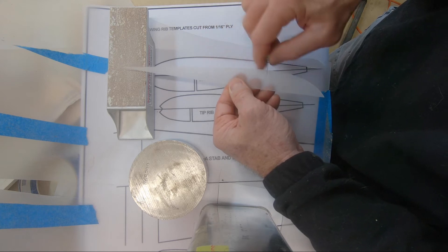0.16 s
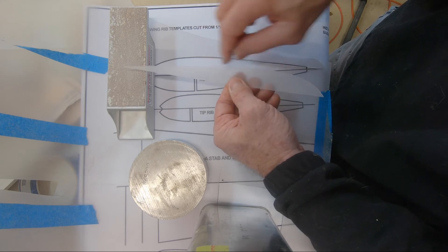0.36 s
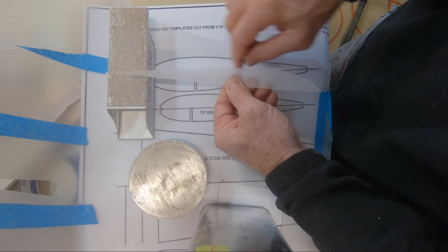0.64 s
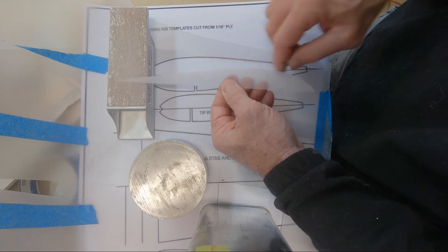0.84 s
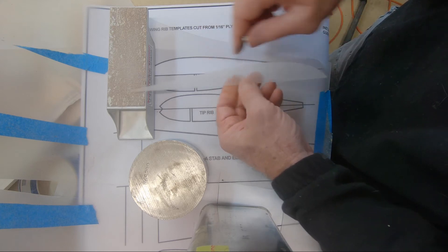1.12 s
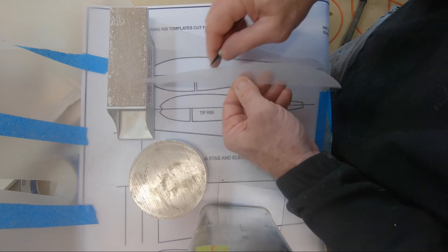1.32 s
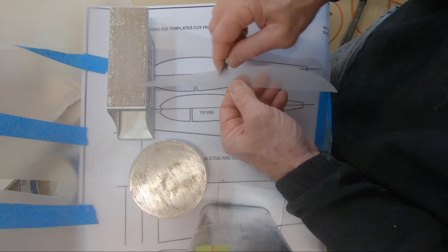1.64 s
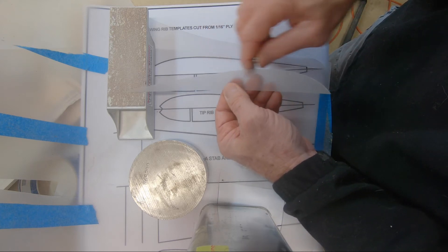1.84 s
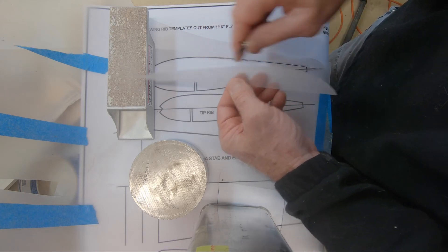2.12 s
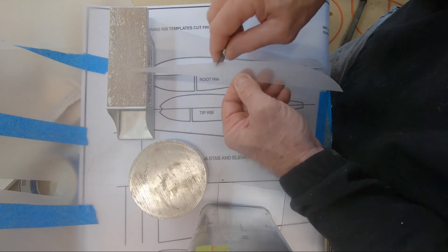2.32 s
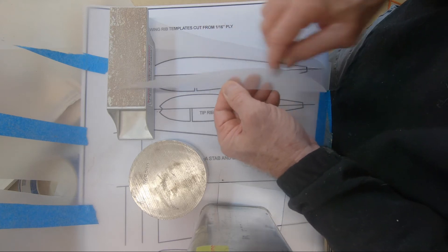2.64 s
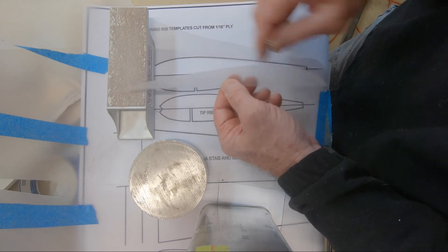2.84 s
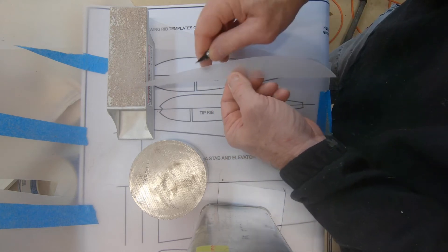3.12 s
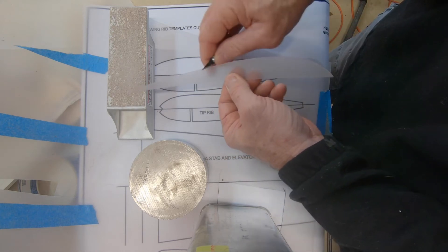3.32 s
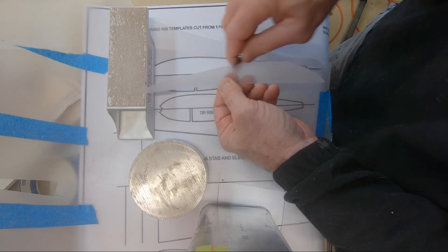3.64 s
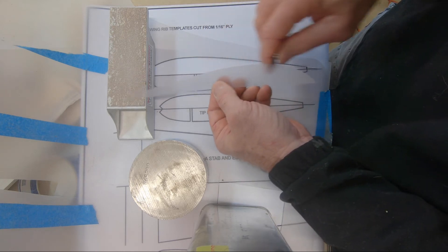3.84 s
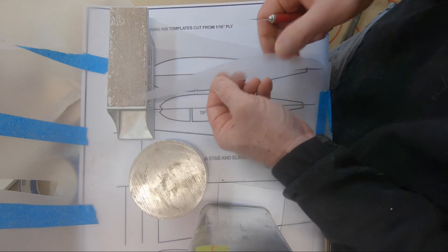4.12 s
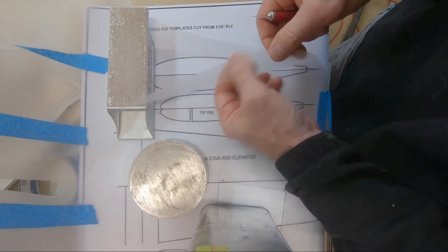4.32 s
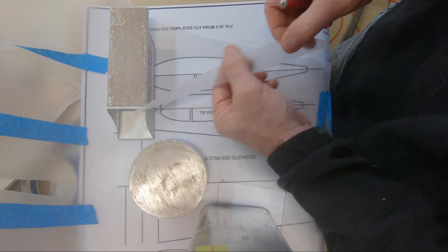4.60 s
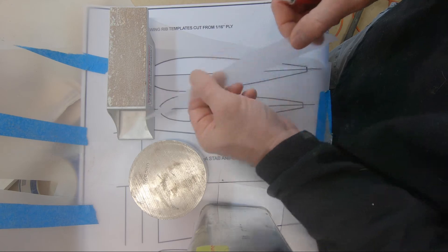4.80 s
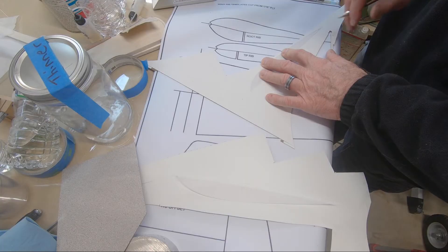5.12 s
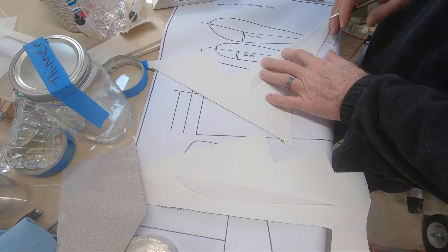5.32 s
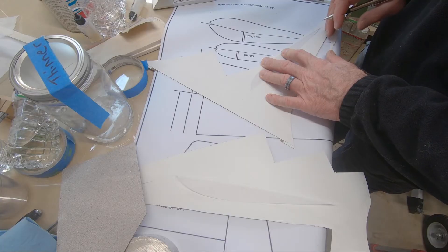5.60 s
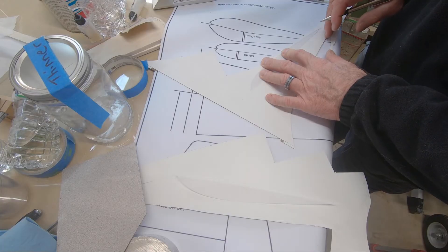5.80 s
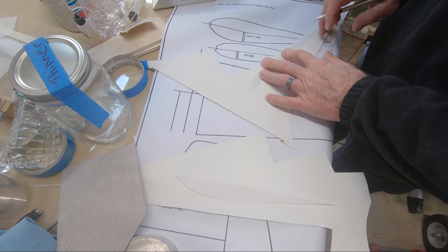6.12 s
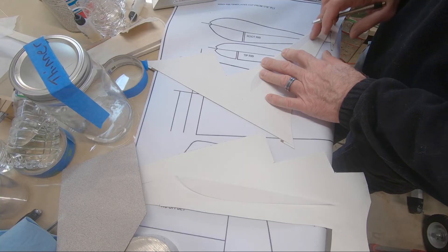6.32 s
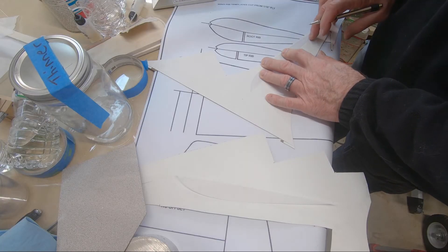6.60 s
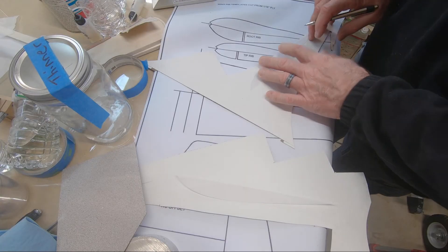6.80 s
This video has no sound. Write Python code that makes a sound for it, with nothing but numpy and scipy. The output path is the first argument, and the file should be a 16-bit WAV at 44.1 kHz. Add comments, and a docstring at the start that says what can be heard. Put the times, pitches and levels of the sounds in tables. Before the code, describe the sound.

A hobby knife scrapes a thin plastic sheet in five short raspy strokes over a low hum, then the hum cuts and quiet handling follows.

```python
"""Knife on a plastic sheet

Close at a workbench, two microphones hear a hobby knife scrape a thin plastic sheet in five short strokes and a
light last one. Trains of tiny slips shake the sheet's modes, ring the blade and rasp at the edge; catches and
taps are short tones and noise bursts. Between strokes grainy noise slides on paper, over a low resonant hum and
faint fast ticking. Then the hum drops away abruptly, and the sheet is shifted about quietly on the bench in a
much quieter room."""
import sys
import numpy as np
from scipy import signal
from scipy.fft import rfft, irfft, next_fast_len
from scipy.io import wavfile
from scipy.ndimage import uniform_filter1d, map_coordinates

SR = 44100
rng = np.random.default_rng(int(sys.argv[2]) if len(sys.argv) > 2 else 0)


def dump(signal):
    """Clip the signal to [-1, 1] and save it as 16-bit WAV at the path in sys.argv[1]."""
    limited = np.clip(np.atleast_2d(signal).T, -1, 1)
    pcm = np.round(limited * 32767).astype(np.int16)
    wavfile.write(sys.argv[1], SR, pcm)


N = 306932
TIME = np.arange(N) / SR

# In mode tables, level is the relative gain at the centre of a resonance; spectra are relative too.
# Resonances of the hum: (centre [Hz], width [Hz], level [dB])
HUM_MODES = [(148.9, 6.8, 0.5), (167, 76, -15), (220.1, 14.9, -7)]
# Air of the place with the hum, then without: (frequency [Hz], relative density [dB per Hz])
LOUD_AIR_SPECTRUM = [(20, -16.5), (75, -6.5), (118, -11), (150, 4.5), (230, -2), (300, -6.5), (360, -13.5),
                     (450, -16), (580, -23.5), (820, -21), (1150, -31), (1620, -30), (1900, -39),
                     (2500, -43), (7000, -40.5), (13000, -68.5)]
QUIET_AIR_SPECTRUM = [(12, -39), (20, -1), (103, -17.5), (155, -2), (235, -8.5), (409, -15), (445, -14.5),
                      (484, -21), (774, -10.5), (841, -12), (1110, -22.5), (1390, -20.5), (2480, -28.5),
                      (6010, -25.5), (15000, -51)]
# Stereo width of the close work, then of the room: (frequency [Hz], gain into the side signal [dB])
WORK_SIDE_SPECTRUM = [(600, -11.5), (1100, -19), (1400, -14.5), (1800, -8.5), (2800, -13), (3800, -27),
                      (5000, -8.5), (7000, -4.5), (13000, -2)]
AIR_SIDE_SPECTRUM = [(50, -10), (150, -29.5), (220, -26), (300, -7.5), (500, 0), (800, 2.5), (1500, 4),
                     (3000, 0), (6000, 3), (13000, 1)]
# Sheet and hand slide on the paper; the one at 3.984 s is a light last stroke of the knife, drawn the same way:
# (start [s], length [s], share of the length until top speed [1], level before SLIDE_TRIM_DB [dB], hiss re
# swish [dB])
SLIDES_AND_LIGHT_STROKE = [ (0.37, 0.096, 0.62, -78, 12), (0.859, 0.22, 0.65, -52, -6),
                           (0.936, 0.068, 0.19, -56, 11), (1.135, 0.14, 0.22, -52.5, 0),
                           (1.34, 0.075, 0.88, -68, 2.5), (2.845, 0.088, 0.35, -63, -2),
                           (3.031, 0.2, 0.57, -46.5, -13.5), (3.984, 0.2, 0.66, -65, -3),
                           (4.219, 0.098, 1, -58.5, -3.5), (4.34, 0.13, 0.98, -73, 4.5),
                           (4.51, 0.14, 0.25, -56.5, 5.5), (4.522, 0.33, 0.78, -49.5, 6), (4.84, 0.048, 1, -60, -5),
                           (5.343, 0.24, 0.52, -61, -14), (5.806, 0.061, 0.9, -75.5, 13),
                           (6.142, 0.071, 0.37, -66.5, -6), (6.222, 0.078, 0.39, -58, -2.5),
                           (6.29, 0.063, 0.51, -76, 9), (6.24, 1, 0.83, -70, -2.5), (6.38, 0.14, .4, -75, 2),
                           (6.584, 0.11, 0.61, -74, 4), (6.717, 0.11, .55, -68.5, 1),
                           (6.815, 0.067, 0.45, -61, -23), ]
# Spectra of slow and fast sliding: (frequency [Hz], level [dB])
SWISH_SPECTRUM = [(500, -36.5), (1100, -2), (1750, 3.5), (2150, 3.5), (2700, 2), (3200, 3.5), (3800, 5),
                  (4500, 1), (6000, -4.5), (9000, -28), (12000, -64)]
HISS_SPECTRUM = [(3200, -42), (5000, -5.5), (6400, -0.5), (7600, -1), (9800, -8.5), (11300, -24),
                 (14000, -24), (15500, -28)]
# The sliding sheet squeaks in one mode; the one at 4.026 s is the blade ringing in the light last stroke:
# (start [s], end [s], centre [Hz], width of each filter pass [Hz], level at the middle [dB], glide as a share
# of the pitch [1])
SQUEAKS_AND_BLADE_RING = [(1.152, 1.232, 7160, 1000, -55, -0.13), (1.15, 1.252, 3920, 600, -63, 0),
                          (3.037, 3.234, 2670, 600, -56, 0.01), (3.052, 3.23, 3220, 700, -54.5, 0.0046),
                          (4.026, 4.1, 3820, 500, -64, -.03), (4.029, 4.116, 1650, 250, -59.5, -0.061),
                          (4.514, 4.76, 3120, 700, -53, -.04), (4.515, 4.66, 6900, 1600, -55, -0.079),
                          (4.623, 4.8, 6400, 700, -57, -0.02), (4.74, 4.85, 3180, 1400, -50, 0.054),
                          (4.64, 4.852, 10250, 4020, -60, 0), (4.872, 4.904, 3350, 700, -57, -0.075),
                          (5.308, 5.35, 6300, 2500, -66, -0.013), (5.37, 5.405, 4250, 600, -73, -0.06),
                          (5.38, 5.517, 3620, 300, -68, -.02), (5.887, 5.982, 2060, 380, -77, .04),
                          (6.215, 6.298, 1910, 250, -74, -0.086)]
# Light taps of blade and sheet: (time [s], level before TAP_TRIM_DB [dB], centre [Hz], t60 [s])
LIGHT_TAPS = [(.8335, -24.5, 4360, 0.014), (1.139, -42, 3700, .03), (1.274, -41, 1350, 0.08),
              (1.275, -44.5, 5400, 0.029), (1.7025, -41, 1263, 0.045), (1.897, -31, 1140, 0.06),
              (1.958, -33, 1090, 0.04), (2.342, -58, 1680, 0.021), (2.377, -41, 1610, 0.057),
              (3.039, -36.5, 3000, 0.14), (3.2365, -45, 1500, 0.12), (3.3, -45, 3580, 0.042),
              (3.3825, -35, 1560, 0.05), (3.932, -34, 1310, 0.18), (4.2645, -43, 3950, 0.016),
              (4.2645, -40.5, 1210, 0.03), (4.419, -48.5, 1290, 0.038), (4.44, -49, 1490, 0.037),
              (5.443, -53, 2780, .012), (6.8211, -53, 2800, 0.034), (6.855, -51, 2730, 0.038),
              (6.878, -57, 2300, .02), (6.947, -37.5, 404, 0.058), (6.9475, -45, 1150, .05),
              (6.9487, -34.5, 1990, 0.016)]
# Every touch-down ticks on the sheet, every bite knocks it: (level before TAP_TRIM_DB [dB], centre [Hz], t60 [s])
TOUCH_DOWN_TAP = (-47.5, 1250, 0.076)
BITE_KNOCK = (-36.5, 1280, 0.087)
# The sheet flicks against the blade: (time [s], peak level [dB])
SHEET_FLICKS = [(1.0782, -29.5), (1.0892, -37)]
# Modes of a flick: (centre [Hz], width of each filter pass [Hz], level [dB])
SHEET_FLICK_MODES = [(1060, 760, -9), (1850, 440, 0), (3500, 840, 3), (6700, 2300, -1.5)]
# The knife knocks lightly as it is placed: (time [s], peak level [dB])
KNIFE_KNOCKS = [(5.352, -40.5)]
# Modes of a knock: (centre [Hz], width of each filter pass [Hz], level [dB])
KNIFE_KNOCK_MODES = [(2700, 1100, 0.5), (4080, 580, 3.5), (7800, 640, -3), (9900, 1800, -10)]
# A tiny high snap of the plastic: (time [s], peak level [dB])
PLASTIC_SNAPS = [(6.0005, -48.5)]
# Modes of the snap: (centre [Hz], width of each filter pass [Hz], level [dB])
PLASTIC_SNAP_MODES = [(4150, 1200, -12.5), (6170, 600, 0), (7000, 800, -0.5), (10200, 1800, -16)]
# The blade's tip pricks the plastic, dry and without a ring: (time [s], peak level [dB])
TIP_PRICKS = [(3.2365, -47), (3.247, -45), (3.2575, -46), (3.3145, -37.5), (3.382, -40), (3.388, -38),
              (3.4965, -31), (3.504, -31), (4.8725, -44), (5.3172, -49), (5.3455, -56), (6.388, -55),
              (6.3995, -53)]
# Broad resonances of a prick: (centre [Hz], width of each filter pass [Hz], level [dB])
TIP_PRICK_MODES = [(1890, 2040, -2.5), (3800, 1300, 0.5), (6240, 1900, -3.5)]
# The blade catches and lets go, once or in a quick run: (time [s], level before CATCH_TRIM_DB [dB],
# length of the run [s], median ring pitch [Hz], rise [s])
BLADE_CATCHES = [(1.9304, -19, .003, 3830, 0.0014), (2.3757, -42, .01, 3700, 0.0013),
                 (2.5557, -26, .016, 3790, 0.0041), (2.5812, -23, .003, 3900, 0.0016),
                 (2.5897, -19, .003, 3950, 0.0015), (2.597, -34, .003, 3850, 0.0023),
                 (2.6545, -29, .003, 3900, 0.0015), (2.676, -25, .01, 3980, 0.0012),
                 (2.7055, -31, .003, 3850, 0.0014), (3.2365, -40.5, .003, 3780, 0.0012),
                 (3.3855, -41, .024, 3830, 0.003), (3.734, -35, .003, 3300, 0.0011),
                 (3.805, -19.5, .003, 3700, 0.0015), (3.8095, -26, .003, 3400, 0.0016),
                 (3.8327, -27.5, .003, 3480, 0.001), (3.8395, -23.5, .003, 3690, 0.0015),
                 (3.846, -22.5, .016, 3850, 0.0021), (3.867, -19.5, .003, 4070, 0.0019),
                 (3.873, -27.5, .003, 3860, .001), (3.9235, -25, .01, 3790, 0.00086),
                 (3.9744, -28.5, .003, 3909, 0.0007), (4.128, -46, .003, 3680, 0.0014)]
# Strokes, in which the blade touches down, skims, bites, is drawn along and lifts: (bite time [s],
# skim before it [s], draw [s], sheet level [dB], skim re sheet [dB], growth over the draw [dB],
# swell in mid-draw [dB], blade ring re sheet [dB], edge rasp re sheet [dB], top of the rasp [dB])
KNIFE_STROKES = [ (0.0, .01, .15, -43.5, 8.5, -0.5, 2, -8, -2.5, 5.5),
                 (0.53, 0.025, 0.322, -45, -10.5, 2, 3, -13, -4.5, 5),
                 (1.701, 0.14, 0.25, -46, -8.5, -4.5, 3, -2.5, -5, 3),
                 (2.457, .113, .29, -43.5, -8, -5, 4.5, -4.5, -5, 5.5),
                 (3.482, .181, 0.47, -49, -5, 2, 1, -3, -4.5, 3.5), ]
# The grip sets each stroke's resonances: (flex [Hz], flex level [dB], first rasp [Hz], second rasp [Hz],
# low bending [dB])
HAND_GRIPS = [(1893, 1, 5360, 8000, -4), (1900, 2, 5220, 8200, -0.5), (2750, -3.5, 6240, 8000, 2.5),
              (2830, -1, 6100, 8400, 0), (2750, -2, 5840, 6900, -1)]
# Bending modes of the held sheet: (centre [Hz], width [Hz], level [dB])
SHEET_MODES = [(667, 240, -15), (794, 130, -4.5), (1058, 200, -1), (1274, 236, -3.5), (1563, 95, 0),
               (1832, 170, -4), (3310, 410, -7.5)]
# Stiffer flexing close to the fingers: (centre [Hz], width [Hz], level [dB])
FLEX_MODES = [(3085, 180, -10), (3170, 1300, -7.5)]
# Modes of the blade: (centre [Hz], width [Hz], level [dB])
BLADE_MODES = [(3750, 570, -0.5), (3977, 303, 3.5)]
# Spectrum of the cutting edge: (frequency [Hz], level [dB])
RASP_SPECTRUM = [(2200, -24.5), (4000, -7), (4900, 3.5), (6600, -2.5), (8600, -3), (10000, -10.5),
                 (11300, -24.5), (13500, -27.5), (15500, -34)]
# Friction locks on to one mode during a stroke: (start [s], end [s], centre [Hz],
# width of each filter pass [Hz], level at the middle [dB], glide as a share of the pitch [1])
STROKE_SCREECHES = [(0.024, 0.06, 5680, 456, -48, -.04), (.12, 0.16, 7500, 1000, -50, -0.0031),
                    (0.533, 0.588, 4950, 400, -49, -.1), (0.63, 0.784, 2900, 1000, -58.5, 0),
                    (0.71, 0.808, 7700, 1100, -42, 0), (.742, 0.79, 5340, 900, -38, -0.01),
                    (0.752, .795, 4030, 600, -35.5, -0.056), (0.816, 0.84, 8350, 700, -49, -0.028),
                    (1.808, 1.857, 5950, 600, -50, 0.092), (1.871, 1.885, 8000, 1200, -51, 0),
                    (2.469, 2.568, 1400, 260, -45, 0.196), (2.534, 2.585, 6300, 900, -37, -0.05),
                    (2.609, 2.674, 8200, 802, -41, 0.074), (2.617, 2.658, 6270, 600, -40, 0.017),
                    (3.81, 3.818, 3020, 1200, -32.5, -0.018), (3.832, 3.88, 7770, 1100, -44.5, .03),
                    (3.833, 3.895, 3870, 700, -42, 0.049)]
# The edge digs deeper or eases: (time [s], half length at 1/e [s], more blade ring [dB], more rasp [dB])
EDGE_DIGS = [(0.04, 0.028, -11, 4), (0.53, 0.0085, 8, 14), (0.585, 0.033, -9, -2), (0.765, 0.091, 9, 8),
             (1.596, 0.019, 13.5, 8), (1.737, 0.014, 6, 4), (1.924, 0.014, 12.5, 4.5), (2.454, 0.026, 7, 8),
             (2.56, 0.046, 4, 5), (2.677, 0.11, 9.5, 6), (3.527, 0.025, 2.5, 3.5), (3.792, 0.031, 9.5, 0),
             (3.862, 0.041, 13.5, 4), (3.917, 0.034, 8, 1.5)]

HUM_DB, HUM_END_S = -47, 4.906
LOUD_AIR_DB, QUIET_AIR_DB = -51, -71
WHINE_HZ, WHINE_DB = 829, -78  # a thin whine rides on the hum
TICKS_PER_S = 20.5
HOLD_DB = -82.5  # the held sheet never lies quite still on the paper
SLIDE_TRIM_DB, TAP_TRIM_DB, CATCH_TRIM_DB = -7.5, -10, -5
SWISH_POWER, HISS_POWER = 0.72, 1.07  # each grows as this power of the sliding speed
SPEED_UP, SLOW_DOWN = 2.6, 1.26  # powers of the arch; higher: a more abrupt start or stop
# The fingers fidget with the held sheet; level is before TAP_TRIM_DB and scattered, pitch spans two octaves
FIDGETS_PER_S, FIDGET_DB, FIDGET_HZ, FIDGET_T60_S = 12, -60, 1500, 0.048
FLICK_RISE_S, KNOCK_RISE_S, PRICK_RISE_S = 0.0012, 0.0037, 0.001
CATCH_GAP_S = 0.0078  # between catches in a run; median gap between shavings
ATTACK_S = 0.013
EASE_S, EASE_DB, LIFT_S, LIFT_DB = 0.019, -3.5, 0.017, -18
SKIM_GROWTH_DB_PER_S = 69  # the blade settles while it skims
SKIM_RASP_DB = -2.5  # the edge rasps less until it bites
SLOW_ENDS_DB = -2  # the hand is slow at both ends of a stroke, so ring and rasp are weaker there
DIG_DAMPING = 0.088  # dB that the sheet loses for each dB of added rasp
FLEX_DB = -16  # stiff flexing re a blade ring of 0 dB; it grows faster than the ring
SURGE_DB, SURGE_RATE = 1.28, 32  # the hand presses unevenly: spread, changes per s
TOP_HZ = 15650


def undb(db):
    """Decibels to gain."""
    return 10 ** (np.asarray(db) / 20)


def unit(x):
    """Scale to rms 1."""
    return x / np.sqrt(np.mean(x ** 2))


def colour(x, points):
    """Filter by a (frequency [Hz], level [dB]) spectrum."""
    hz, db = np.transpose(points)
    size = next_fast_len(N + SR // 10, True)
    bins = np.fft.rfftfreq(size, 1 / SR)
    gain = undb(np.interp(np.log(bins + 1), np.log(hz), db))
    return irfft(rfft(x, size) * gain, size)[:N]


def resonate(x, hz, width):
    """One resonance, gain 1 at its centre."""
    b, a = signal.iirpeak(min(hz, SR / 2 - 1), hz / width, fs=SR)
    return signal.lfilter(b, a, x)


def ring(x, modes):
    """A body with several modes; neighbours swing in opposite directions."""
    return sum((-1) ** k * undb(db) * resonate(x, hz, width) for k, (hz, width, db) in enumerate(modes))


def band(x, lo_hz, hi_hz):
    """Keep one band."""
    return signal.sosfilt(signal.butter(2, [lo_hz, hi_hz], "band", fs=SR, output="sos"), x)


def walk(rate):
    """Smooth random wandering with spread 1."""
    size = int(SR / rate)
    smooth = uniform_filter1d(rng.standard_normal(N), size)
    return unit(uniform_filter1d(smooth, size))


def swell(times, db, fade_s=0.0029):
    """Gain along a level curve, silent outside it."""
    gain = np.zeros(N)
    first, last = times[0] - fade_s, times[-1] + fade_s
    span = slice(max(int(first * SR), 0), int(last * SR))
    gate = np.interp(TIME[span], [first, times[0], times[-1], last], [0, 1, 1, 0])
    gain[span] = gate * undb(np.interp(TIME[span], times, db))
    return gain


def add(track, s, sound):
    """Mix a sound in at a time."""
    start = int(s * SR)
    track[start:start + len(sound)] += sound[:max(N - start, 0)]


def workshop():
    """Turbulent air drones unevenly in low resonances under a thin whine, then yields to a much quieter room."""
    resonances = unit(band(ring(rng.standard_normal(N), HUM_MODES), 142, 254))
    drone = undb(HUM_DB + walk(3.4)) * resonances
    air = undb(LOUD_AIR_DB + 1.2 * walk(15)) * unit(colour(rng.standard_normal(N), LOUD_AIR_SPECTRUM))
    whine = undb(WHINE_DB) * unit(np.sin(2 * np.pi * WHINE_HZ * TIME + walk(6.3)))
    quiet = undb(QUIET_AIR_DB) * unit(colour(rng.standard_normal(N), QUIET_AIR_SPECTRUM))
    humming = np.clip((HUM_END_S - TIME) / 0.002, 0, 1)
    return humming * (drone + air + whine) + (1 - humming) * quiet


def ticking(jitter_s=0.0051, length_s=0.0051, near_db=-67, far_db=-74):
    """A small mechanism ticks in faint, high, slightly uneven noise puffs, fainter once the hum is gone."""
    gate, t = np.zeros(N), TIME[:SR // 40]
    for k, (late, size) in enumerate(rng.standard_normal((int(TICKS_PER_S * N / SR), 2))):
        puff = undb(1.5 * size) * np.exp(-(t / length_s - 2) ** 2)
        add(gate, abs(k / TICKS_PER_S + jitter_s * late), puff)
    spectrum = [(3500, -40), (5200, -9.5), (6600, 5), (8000, -12.5), (9800, -15.5), (11500, -62.5)]
    noise = unit(colour(rng.standard_normal(N), spectrum))
    return noise * gate * undb(np.where(TIME < HUM_END_S, near_db, far_db))


def slips(rate, scatter_db, rub):
    """Stick and slip: tiny jerks of uneven size over smooth rubbing."""
    sizes = undb(scatter_db * np.clip(rng.standard_normal(N), -2, 2))
    jerks = (rng.random(N) < rate / SR) * sizes
    return unit(unit(jerks - jerks.mean()) + rub * rng.standard_normal(N))


def travel(x, depth, wander_s):
    """Waves return from the sheet's ends; the paths change as the contact moves, so the colour keeps shifting."""
    out = x.copy()
    for path_s in (0.0015, 0.0029, 0.0053):
        out += depth * np.interp(TIME - path_s - wander_s * walk(6.52), TIME, x)
    return out


def squeal(drive, rows):
    """Friction locks on to one mode for a moment: it swells, glides as the contact moves, and fades."""
    out = np.zeros(N)
    for start, end, hz, width, db, glide in rows:
        middle = (start + end) / 2
        gain = swell([start, middle, end], [db - 9, db, db - 8])
        on = gain > 0
        warped = TIME[on] + glide * (TIME[on] - middle) ** 2 / (2 * (end - start))
        mode = resonate(resonate(drive, hz, width), hz, width)
        out[on] += gain[on] * unit(map_coordinates(mode, [warped * SR], mode="nearest"))
    return out


def speed(start, length_s, top_share):
    """One push of the hand: an arch from rest up to 1 and back to rest."""
    top = start + length_s * np.clip(top_share, 0.05, 0.95)
    away = np.interp(TIME, [start, top, start + length_s], [1, 0, 1])
    return 1 - away ** np.where(TIME < top, SPEED_UP, SLOW_DOWN)


def sliding():
    """Fine paper grain passes under the sheet: a soft swish, hissier when fast, with small squeaks; a light
    last knife stroke, with its blade ring, is drawn the same way."""
    rubbing = slips(rate=5000, scatter_db=3, rub=0.96) * undb(1.5 * walk(64))
    grain = travel(rubbing, depth=0.13, wander_s=0.00036)
    swish, hiss = unit(colour(grain, SWISH_SPECTRUM)), unit(colour(grain, HISS_SPECTRUM))
    out = swish * undb(HOLD_DB + 1.9 * walk(9)) * (TIME < HUM_END_S)
    for start, length_s, top_share, db, hiss_db in SLIDES_AND_LIGHT_STROKE:
        pace = speed(start, length_s, top_share)
        rush = swish * pace ** SWISH_POWER + undb(hiss_db) * hiss * pace ** HISS_POWER
        out += undb(db + SLIDE_TRIM_DB) * rush
    return out + squeal(grain, SQUEAKS_AND_BLADE_RING)


def taps(spread=0.21, softness=0.017):
    """Dry ticks: a short crackle in a broad resonance; the longer ones start more slowly."""
    out, t = np.zeros(N), TIME[:SR // 10]
    events = list(LIGHT_TAPS)
    for bite, skim_s, *_ in KNIFE_STROKES[1:]:  # the first stroke is already under way
        events += [(bite - skim_s, *TOUCH_DOWN_TAP), (bite, *BITE_KNOCK)]
    for when, size, pitch in rng.uniform(-1, 1, (int(FIDGETS_PER_S * HUM_END_S), 3)):
        s = (when + 1) / 2 * HUM_END_S
        events.append((s, FIDGET_DB + 4 * size, FIDGET_HZ * 2 ** pitch, FIDGET_T60_S))
    for s, db, hz, t60 in events:
        shape = (1 - np.exp(-t / (softness * t60))) * np.exp(-np.log(1000) * t / t60)
        crackle = resonate(rng.standard_normal(len(t)), hz, spread * hz)
        tick = unit(band(crackle, hz / 3, min(4 * hz, 9000))) * shape / shape.max()
        add(out, s, undb(db + TAP_TRIM_DB) * tick)
    return out


def clicks(rows, modes, rise_s):
    """A brief gritty contact rings a few modes."""
    out, t = np.zeros(N), TIME[:SR // 20]
    contact = (t / rise_s * np.exp(1 - t / rise_s)) ** 2
    for s, db in rows:
        sound = np.zeros(len(t))
        for hz, width, mode_db in modes:
            grit = contact * rng.standard_normal(len(t))
            sound += undb(mode_db) * unit(resonate(resonate(grit, hz, width), hz, width))
        add(out, s, undb(db) * sound / np.abs(sound).max())
    return out


def catches(grit=0.36):
    """The blade hooks on the edge; its ring and a noisy crack build up and die within milliseconds."""
    out, t = np.zeros(N), TIME[:SR // 30]
    for s, db, run_s, hz, rise_s in BLADE_CATCHES:
        shape = t / rise_s * np.exp(1 - t / rise_s)
        for late in np.arange(0, run_s - CATCH_GAP_S / 4, CATCH_GAP_S):
            tone = np.sin(2 * np.pi * hz * (1 + 0.025 * rng.standard_normal()) * t)
            crack = band(rng.standard_normal(len(t)), 2100, 7000)
            add(out, s + late, undb(db + CATCH_TRIM_DB) * shape * (tone + grit * crack))
    return out


def shavings(relax_s=0.0024, scatter_db=4, steady=1.8):
    """Coarse grain: at uneven intervals a shaving breaks off, and the force jumps and relaxes."""
    gaps, sizes = rng.standard_normal((N // 100, 2)).T
    starts = (np.cumsum(CATCH_GAP_S * np.exp(0.5 * gaps)) * SR).astype(int)
    inside = starts < N
    breaks = np.zeros(N)
    breaks[starts[inside]] = undb(scatter_db * np.clip(sizes, -2, 2))[inside]
    return unit(steady + signal.lfilter([1], [1, -np.exp(-1 / (relax_s * SR))], breaks))


def waver(x, wander_s=0.00029, swing_db=-0.5):
    """A resonance drifts in pitch and strength as the contact moves."""
    drifting = map_coordinates(x, [(TIME - wander_s * walk(22.3)) * SR], order=2, mode="nearest")
    return drifting * undb(swing_db * walk(24))


def digging():
    """Extra blade ring and rasp in dB; each dig comes and goes as a bell curve."""
    blade_db, rasp_db = np.zeros((2, N))
    for s, half_s, more_blade_db, more_rasp_db in EDGE_DIGS:
        depth = np.exp(-np.minimum(((TIME - s) / half_s) ** 2, 20))
        blade_db += more_blade_db * depth
        rasp_db += more_rasp_db * depth
    return blade_db, rasp_db


def stroke_gain(bite, skim_s, draw_s, level_db, skim_db, growth_db):
    """A skim, a sudden bite, a draw that grows or fades evenly; the hand eases off and the blade lifts."""
    times = bite + np.array([-skim_s, 0, ATTACK_S, draw_s, draw_s + EASE_S, draw_s + EASE_S + LIFT_S])
    touch_db = skim_db - SKIM_GROWTH_DB_PER_S * skim_s
    db = np.array([touch_db, skim_db, 0, growth_db, growth_db + EASE_DB, growth_db + LIFT_DB])
    return swell(times, level_db + db, fade_s=0.0024)


def scraping():
    """One train of slips shakes the sheet, rings the blade and rasps at the edge."""
    jerks = slips(rate=1300, scatter_db=1.5, rub=0.77) * undb(0.57 * walk(150))
    force = travel(jerks, depth=0.36, wander_s=0.0004)
    coarse = force * shavings()
    blade = unit(band(ring(coarse, BLADE_MODES), 2300, 4850))
    bending = ring(force, SHEET_MODES)
    stiff = unit(band(ring(coarse, FLEX_MODES), 2530, 3200))
    edge = colour(coarse, RASP_SPECTRUM)
    dig_blade_db, dig_rasp_db = digging()
    out = np.zeros(N)
    for stroke, grip in zip(KNIFE_STROKES, HAND_GRIPS):
        bite, skim_s, draw_s, level_db, skim_db, growth_db, swell_db, blade_db, rasp_db, top_db = stroke
        flex_hz, flex_db, first_hz, second_hz, low_db = grip
        along = np.interp(TIME, [bite, bite + draw_s], [-1, 1])
        skimming = np.interp(TIME, [bite - ATTACK_S, bite + ATTACK_S], [1, 0])
        # a close pair of modes near the fingers
        flex = ring(force, [(flex_hz, 320, flex_db), (1.064 * flex_hz, 380, flex_db)])
        held = colour(bending, [(1100, low_db), (1500, 0)]) + waver(flex, wander_s=0.0005, swing_db=-0.1)
        sheet = unit(band(held, 440, 3400)) * undb(-DIG_DAMPING * dig_rasp_db)
        first_rasp = waver(1.45 * resonate(edge, first_hz, 480))
        second_rasp = waver(0.99 * resonate(edge, second_hz, 760))
        rasp = unit(edge + first_rasp + second_rasp)
        rasp = colour(rasp, [(8500, 0.019), (12500, top_db)])  # the angle of the blade sets its brightness
        ring_db = blade_db + dig_blade_db
        ringing = (blade + stiff * undb(FLEX_DB + ring_db)) * undb(ring_db)
        cutting = ringing + rasp * undb(rasp_db + dig_rasp_db + SKIM_RASP_DB * skimming)
        slowness = along ** 4
        pressure = undb(swell_db * (1 - along ** 2))
        pressure = pressure * stroke_gain(bite, skim_s, draw_s, level_db, skim_db, growth_db)
        out += (sheet + cutting * undb(SLOW_ENDS_DB * slowness)) * pressure
    return (out + squeal(coarse, STROKE_SCREECHES)) * undb(SURGE_DB * walk(SURGE_RATE))


def reflect(x, t60, delay_s):
    """Diffuse reflections: a decaying noise tail, scaled to unit energy."""
    t = TIME[:SR // 2]
    tail = rng.standard_normal(len(t)) * np.exp(-np.log(1000) * t / t60) * (t >= delay_s)
    return signal.fftconvolve(x, tail / np.linalg.norm(tail))[:N]


def scene():
    """The flexing sheet reaches the two microphones in ever-changing phase; the room adds a faint tail."""
    contacts = clicks(SHEET_FLICKS, SHEET_FLICK_MODES, FLICK_RISE_S)
    contacts += clicks(KNIFE_KNOCKS, KNIFE_KNOCK_MODES, KNOCK_RISE_S)
    contacts += clicks(PLASTIC_SNAPS, PLASTIC_SNAP_MODES, FLICK_RISE_S)
    contacts += clicks(TIP_PRICKS, TIP_PRICK_MODES, PRICK_RISE_S)
    close = ticking() + sliding() + taps() + contacts + catches() + scraping()
    mid = close + undb(-10.5) * reflect(close, t60=0.11, delay_s=0.0066) + workshop()
    analytic = signal.hilbert(close, next_fast_len(N, True))[:N]
    scattered = np.real(analytic * np.exp(3j * walk(54)))
    # a second, independent draw of the room air spreads it between the microphones
    side = colour(scattered, WORK_SIDE_SPECTRUM) + colour(workshop(), AIR_SIDE_SPECTRUM)
    side -= 0.019 * close + 0.28 * resonate(close, 8120, 2983)  # the work lies a little to the right
    return np.array([mid + side, mid - side])


def record(dry):
    """The recorder cuts the top with a steep elliptic low-pass."""
    return signal.sosfilt(signal.ellip(10, 0.1, 80, TOP_HZ, fs=SR, output="sos"), dry)


dry = scene()
out = record(dry)
dump(out)
```